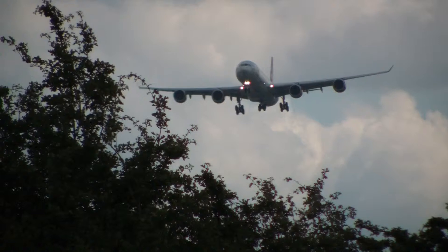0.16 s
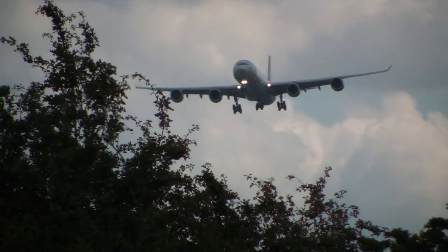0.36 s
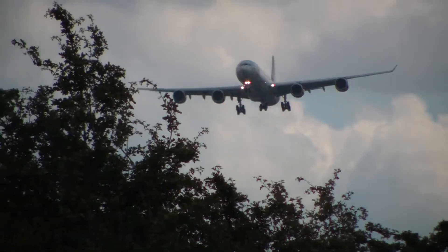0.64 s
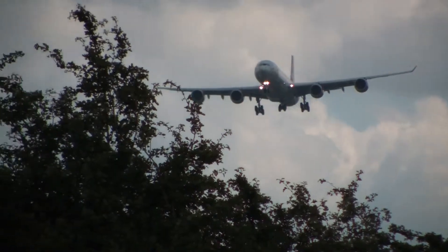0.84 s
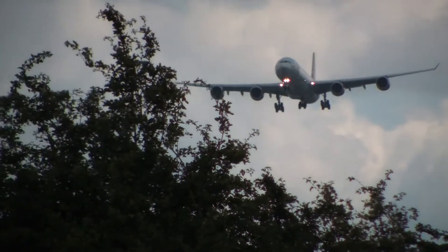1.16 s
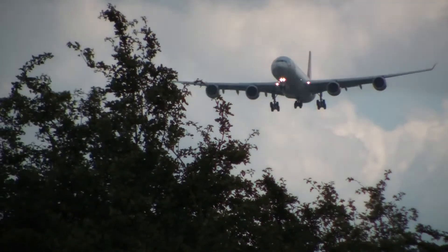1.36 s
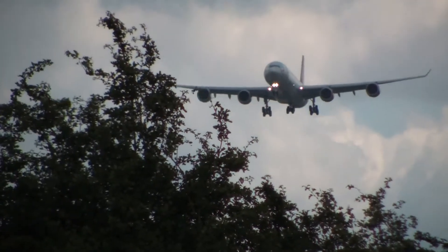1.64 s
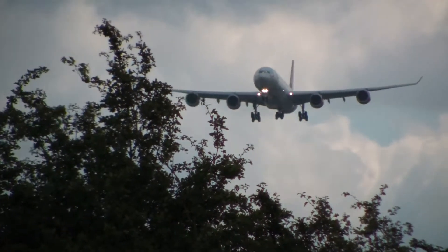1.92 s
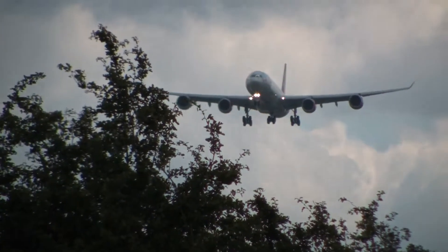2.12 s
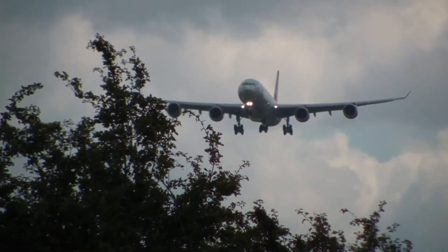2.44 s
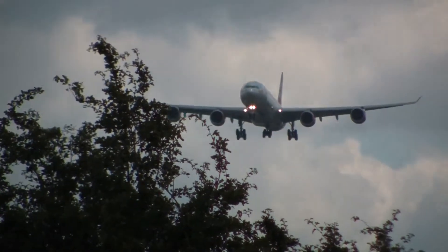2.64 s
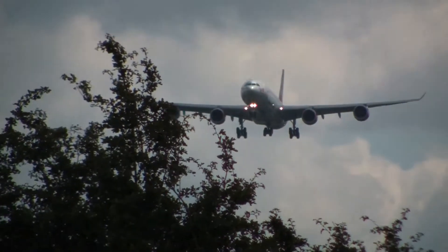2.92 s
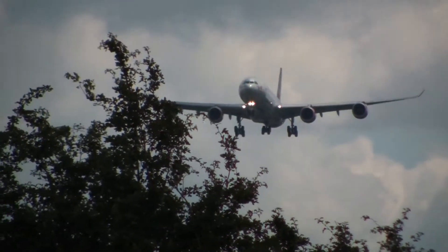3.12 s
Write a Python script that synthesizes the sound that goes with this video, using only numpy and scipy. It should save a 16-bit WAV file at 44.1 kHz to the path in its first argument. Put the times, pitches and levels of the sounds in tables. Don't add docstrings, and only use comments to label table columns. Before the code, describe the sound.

A four-engine jet airliner approaches outdoors, its steady distant roar wavering over a low rumbling drone, while irregular gusts thump and flutter on an unprotected camera microphone; faint thin hiss sits above.

```python
import sys
import numpy as np
from scipy import signal
from scipy.fft import rfft, irfft
from scipy.io import wavfile
from scipy.ndimage import uniform_filter1d

SR = 44100
rng = np.random.default_rng(int(sys.argv[2]) if len(sys.argv) > 2 else 0)


def to_wav(sig):
    pcm = np.clip(np.atleast_2d(sig), -1, 1) * 32767
    pcm = np.round(pcm).astype(np.int16)
    wavfile.write(sys.argv[1], SR, pcm.T)


def makeup_ratio(level_db):
    decades = np.asarray(level_db, float) / 20
    return 10 ** decades


N = 144648
LEVEL, BRIGHTNESS, DRONE_LEVEL, FAN_LEVEL = 1, 2, 3, 4


def evened(x):
    return x / np.sqrt(np.mean(x ** 2) + 1e-20)


def read(points, hz):
    f, value = np.transpose(points)
    return np.interp(np.log(hz + 1), np.log(f + 1), value)


def control(t, column):
    # t/s, level/dB, brightness above the hump/(dB per octave), drone/dB, fan/dB
    roar_moves = [(.17, -22, 3.5, 0, 1.5), (.28, -17.5, 3.5, -1.5, -3), (.42, -21, 2, -1.5, -0.5),
                  (.53, -16.5, 1.5, -4, -3.5), (.7, -17.5, 1.5, 0, -3), (.92, -19, 1.5, -0.5, 0.5),
                  (1.2, -21, 3, -5.5, 2), (1.4, -19.5, 1.5, 0.5, 2), (1.62, -20, 2.5, -4.5, 2.5),
                  (1.8, -20.5, 3.5, -2.5, -0.5), (1.94, -19, 3, -2.5, -6.5), (2.1, -18, 4.5, -3, -3),
                  (2.26, -21.5, 3.5, -1, 0), (2.5, -19, 2, 2.5, -2), (2.7, -18.5, 1.5, 2, 1),
                  (2.88, -21.5, 1.5, 1, 0), (3.08, -21, 1, 2.5, -1.5), (3.28, -22.5, 1, 3, -0.5)]
    moves = np.array(roar_moves)
    return np.interp(t, moves[:, 0], moves[:, column])


def bell(hz, centre_hz, octaves):
    return np.exp(-(np.log2((hz + 1) / centre_hz) / octaves) ** 2)


def far_noise(db):
    # f/Hz, correlation [0-1]
    port_likeness = [(60, 0.79), (130, 0.92), (270, 1), (580, 0.97), (1240, 0.95), (2650, 0.9),
                     (5000, 0.92), (9000, 0.36)]
    # f/Hz, left minus right level/dB
    port_tilt = [(60, 0.5), (210, 1), (750, 1.5), (2650, 2.5)]
    lead_s = 2.8e-5
    hz = np.fft.rfftfreq(1024, 1 / SR)[:, None]
    a, b, c, d = rng.standard_normal((db.shape[1], 513, 4)).T
    same = np.clip(read(port_likeness, hz), 0, 1)
    tilt_db = read(port_tilt, hz) / 2
    left = a + 1j * b
    right = same * left + np.sqrt(1 - same ** 2) * (c + 1j * d)
    right = right * np.exp(-2j * np.pi * hz * lead_s)
    z = np.array([left * makeup_ratio(db + tilt_db), right * makeup_ratio(db - tilt_db)])
    return signal.istft(z, nperseg=1024, noverlap=768)[1][:, :N]


def patches(frames, patch_db):
    flicker_db = 0.05
    field = rng.standard_normal((frames, 514)).T
    spots = uniform_filter1d(uniform_filter1d(field[1:], 14, 0), 16, 1)
    flicker = uniform_filter1d(field[0], 5)
    return patch_db * evened(spots) + flicker_db * evened(flicker)


def jet():
    # f/Hz, level/dB
    exhaust = [(300, -6), (450, -4.5), (650, -0.5), (950, 2.5), (1900, -9.5), (2800, -19.5), (6300, -35.5),
               (8500, -55.5)]
    # f/Hz, level/dB
    engine_rumble = [(20, 1), (60, -2.5), (130, -6.5), (250, 3), (380, -7), (600, -18), (1200, -89)]
    hump_hz, rumble_db, rumble_follows = 1250, -22, 0.82
    hz = np.fft.rfftfreq(1024, 1 / SR)[:, None]
    t = np.arange(N // 256 + 5) * 256 / SR
    octaves_up = np.clip(np.log2((hz + 1) / hump_hz), 0, 2.2)
    bright = octaves_up * control(t, BRIGHTNESS)
    fan = bell(hz, 1960, 0.48) * control(t, FAN_LEVEL)
    core = bell(hz, 920, 0.22) * 0.9 * (control(t, LEVEL) + 20)
    roar = far_noise(read(exhaust, hz) + bright + fan + core + patches(len(t), 1))
    rumble_swell = rumble_follows * control(t, DRONE_LEVEL)
    rumble = far_noise(read(engine_rumble, hz) + rumble_swell + patches(len(t), 1.8))
    roar_db = control(np.arange(N) / SR, LEVEL) + 1.68
    return evened(roar) * makeup_ratio(roar_db) + evened(rumble) * makeup_ratio(rumble_db)


def drone():
    # f/Hz, width/Hz, level/dB
    tones = [(63, 12, -23), (136.1, 23.5, -25.5), (184.1, 10.2, -36), (247.9, 25.6, -31)]
    t, out = np.arange(N) / SR, np.zeros(N)
    for hz, width_hz, db in tones:
        r = np.exp(-np.pi * width_hz / SR)
        wander = rng.standard_normal((N, 2)) @ [1, 1j]
        slow = signal.lfilter([1], np.convolve([1, -r], [1, -r]), wander)
        out += makeup_ratio(db) * evened((slow * np.exp(2j * np.pi * hz * t)).real)
    return out * makeup_ratio(control(t, DRONE_LEVEL) + np.array([[.8], [-.8]]))


def whine():
    # f/Hz, level/dB
    motor_tones = [(12209, -76), (13028, -85), (13254, -91.5)]
    t = np.arange(N) / SR
    tone = sum(makeup_ratio(db + 1) * np.sin(2 * np.pi * hz * t) for hz, db in motor_tones)
    return tone * np.array([[1.3], [.4]])


def eddies(spectrum):
    split_hz = 44.5
    hz = np.fft.rfftfreq(N, 1 / SR)
    z = rfft(rng.standard_normal(N)) * makeup_ratio(read(spectrum, hz))
    low = 1 / (1 + (hz / split_hz) ** 4)
    bands = signal.hilbert(irfft([z * low, z * (1 - low)], N))
    strength = uniform_filter1d(uniform_filter1d(abs(bands) ** 2, 500), 400)
    held = bands.real / np.sqrt(strength + 1e-12)
    return held / held.std(1, keepdims=True)


def wind():
    # t/s, length/s, slow push level/dB, flutter level/dB, port-against-port level/dB
    gusts = [(.24, .06, -18, -14, -24), (.325, .09, -6, -19, -17), (.40, .09, -5, -10, -11),
             (.61, .1, -19, -21, -24), (.745, .08, -5, -9, -11), (.87, .06, -19, -23, -24),
             (.97, .06, -15, -17, -16), (1.03, .07, -12, -15, -17), (1.09, .05, -16, -17, -14),
             (1.195, .07, -5, -12, -8), (1.28, .06, -13, -26, -15), (1.37, .05, -14, -15, -17),
             (1.48, .12, -15, -17, -19), (1.72, .1, -9, -15, -18), (1.80, .06, -10, -24, -18),
             (1.855, .07, -8, -16, -18), (2.03, .05, -30, -23, -27), (2.21, .14, -20, -26, -20),
             (2.69, .07, -20, -17, -22), (2.80, .08, -11, -11, -15), (2.88, .08, -15, -17, -18),
             (2.98, .08, -17, -14, -26), (3.12, .07, -15, -15, -22), (3.25, .08, -2, -10, -10)]
    # push, flutter and port-against-port level/dB
    breeze_db = (-22.5, -28, -35)
    # f/Hz, level/dB
    shared_wind = [(6, -9), (15, 4.5), (30, -3), (70, -8.5), (150, -18), (400, -36.5), (1500, -86),
                   (4000, -130)]
    # f/Hz, level/dB
    port_wind = [(6, -14), (25, -1), (60, 2), (130, -4), (250, -15), (450, -25.5), (1500, -63.5),
                 (4000, -130)]
    t = np.arange(N) / SR
    power = makeup_ratio(np.array(breeze_db))[:, None] ** 2 * np.ones(N)
    for s, length, *dbs in gusts:
        swell = np.exp(-(2 * (t - s) / length) ** 2)
        power = power + (makeup_ratio(np.array(dbs))[:, None] * swell) ** 2
    push, flutter, against = np.sqrt(power)
    slow, quick = eddies(shared_wind)
    both = push * slow + flutter * quick
    opposed = against * evened(eddies(port_wind).sum(0))
    return both * makeup_ratio(np.array([[.5], [-.5]])) + opposed * np.array([[1], [-1]])


def hiss():
    # f/Hz, level/dB
    fizz = [(3000, -14), (7000, 2.5), (9000, 0), (12000, -5), (13500, -10), (15000, -24)]
    hiss_db, follows = -51.5, 1.2
    shape = makeup_ratio(read(fizz, np.fft.rfftfreq(N, 1 / SR)))
    a, b = irfft(rfft(rng.standard_normal((2, N))) * shape, N)
    swell_db = follows * control(np.arange(N) / SR, BRIGHTNESS)
    ports = np.array([a, 1.06 * b - 0.41 * a])
    return makeup_ratio(hiss_db + swell_db + np.array([[2.5], [-2.5]])) * evened(ports)


def scene():
    return jet() + drone() + whine() + wind() + hiss()


def gain_control(x):
    duck_from_db, duck, recover_db_per_s, ceiling = -8.5, 0.31, 22, 1
    power_db = 10 * np.log10(abs(uniform_filter1d((x ** 2).mean(0), 600)) + 1e-12)
    fall = np.arange(N) * recover_db_per_s / SR
    held_db = np.maximum.accumulate(power_db + fall) - fall
    over_db = np.maximum(held_db - duck_from_db, 0)
    return np.clip(x / makeup_ratio(duck * uniform_filter1d(over_db, 300)), -ceiling, ceiling)


def thinned(x):
    # f/Hz, level/dB
    gate = [(5500, -30), (7500, -3), (9000, 1), (13000, 2), (14500, 8)]
    patch_db = 2.5
    hz, t, z = signal.stft([x[0] + x[1], x[0] - x[1]], SR, nperseg=2048)
    spots = uniform_filter1d(rng.standard_normal(z.shape[::-1]).T, 60, 1)
    spots = evened(uniform_filter1d(spots, 3, 2))
    usual = uniform_filter1d(np.median(abs(z), 2), 40, 1)[..., None]
    held = uniform_filter1d(abs(z), 2, 2)
    threshold = usual * makeup_ratio(read(gate, hz)[:, None] + patch_db * spots)
    kept = z * (held > threshold)
    mid, side = signal.istft(kept, SR, nperseg=2048)[1][:, :N]
    return np.array([mid + side, mid - side]) / 2


def band_limit(x):
    return signal.sosfilt(signal.butter(12, 15200, fs=SR, output="sos"), x)


def record(dry):
    start_s, fade_s = .165, 0.0066
    x = gain_control(dry)
    x = signal.oaconvolve(x, signal.firwin(255, 22000, fs=SR)[None], "same")
    opening = np.clip((np.arange(N) / SR - start_s) / fade_s, 0, 1)
    return band_limit(thinned(x) * opening)


dry = scene()
out = record(dry)
to_wav(out)
```